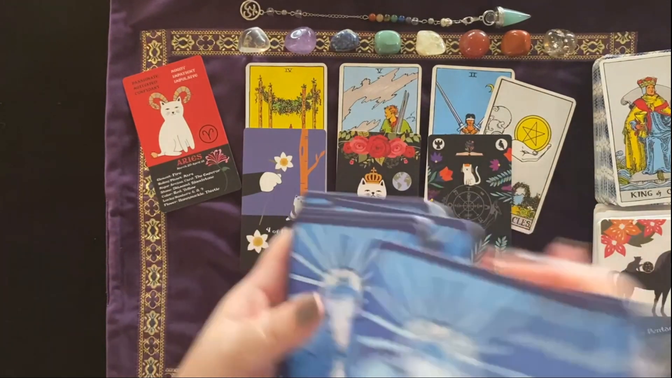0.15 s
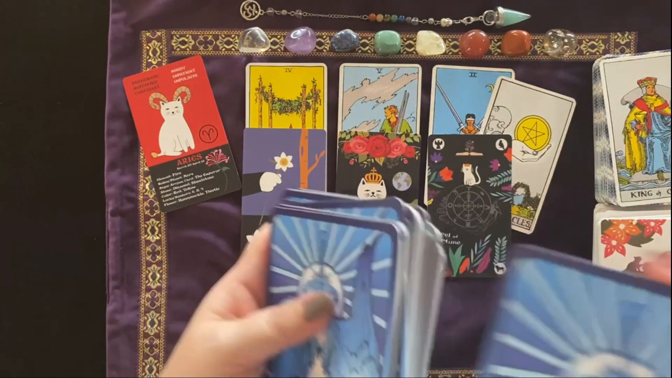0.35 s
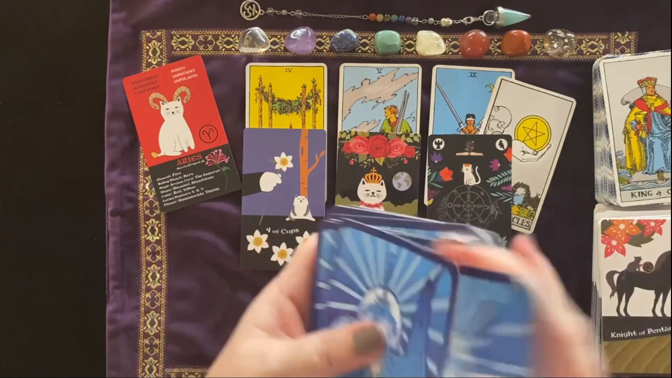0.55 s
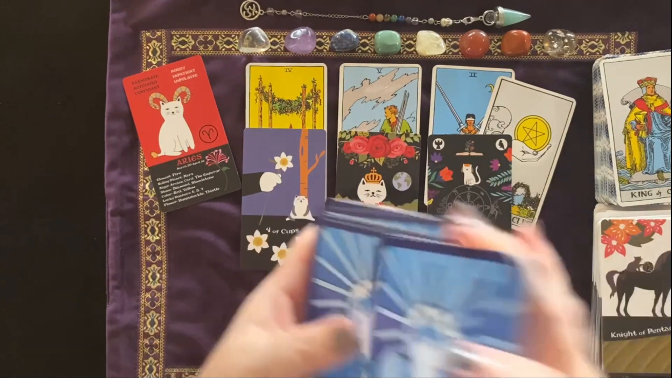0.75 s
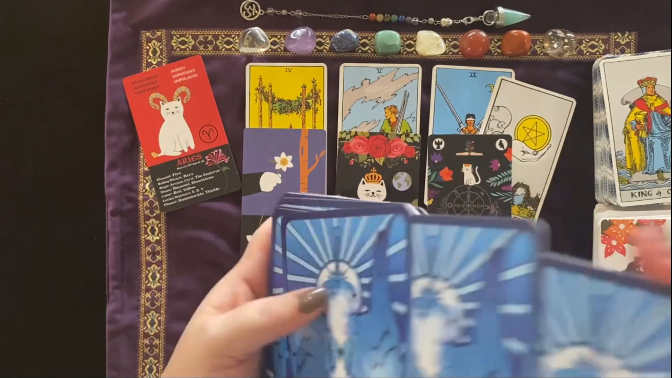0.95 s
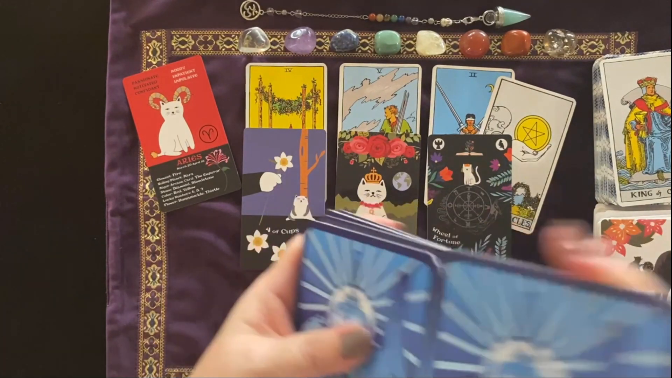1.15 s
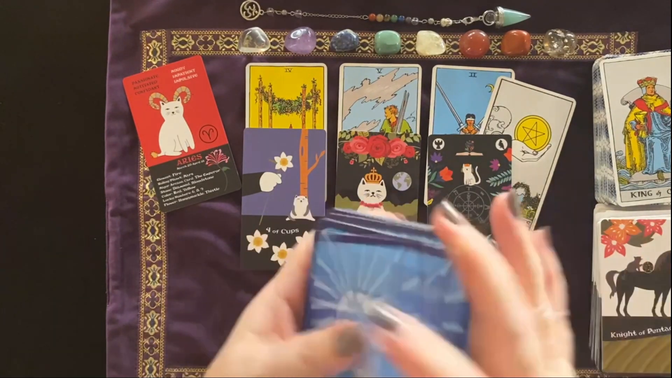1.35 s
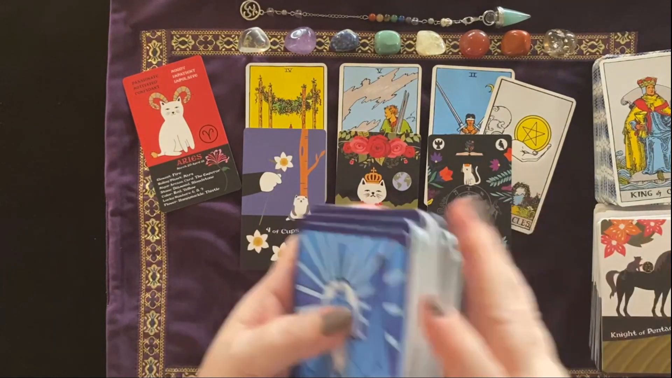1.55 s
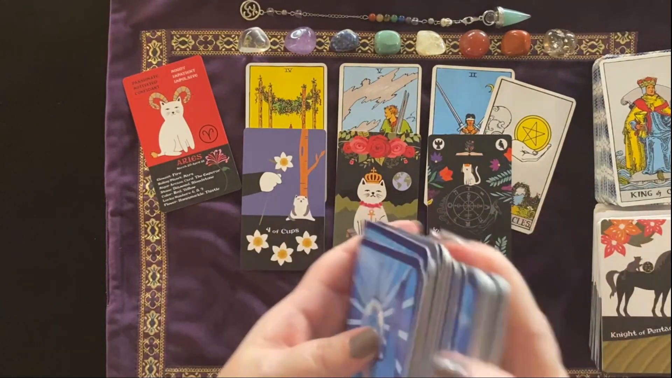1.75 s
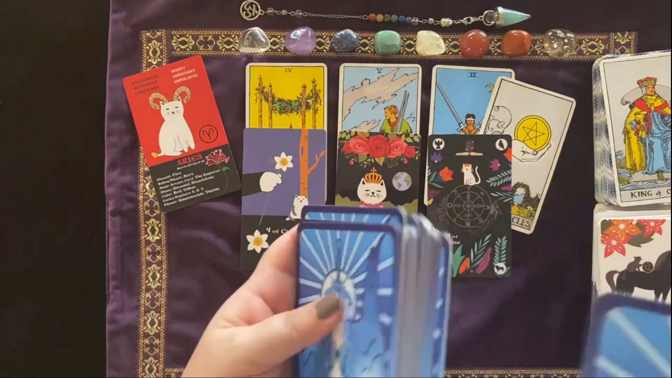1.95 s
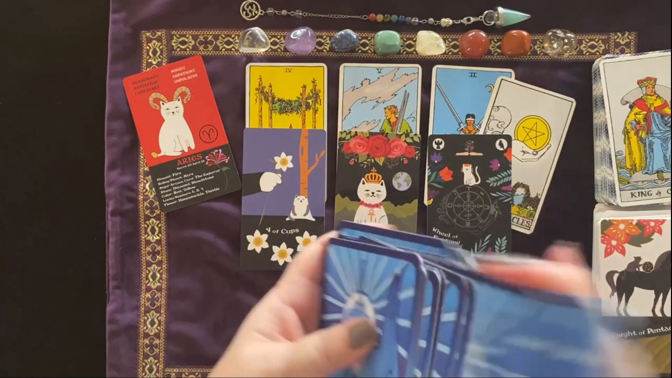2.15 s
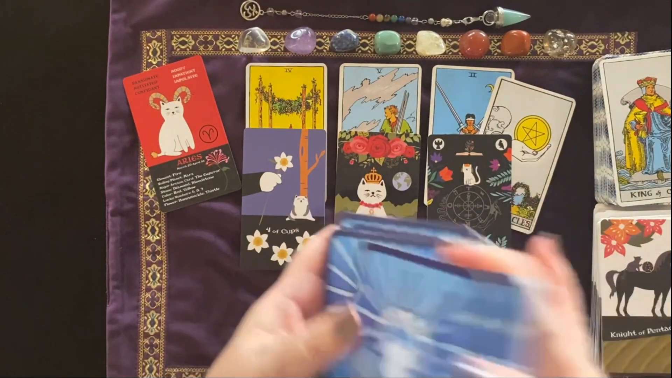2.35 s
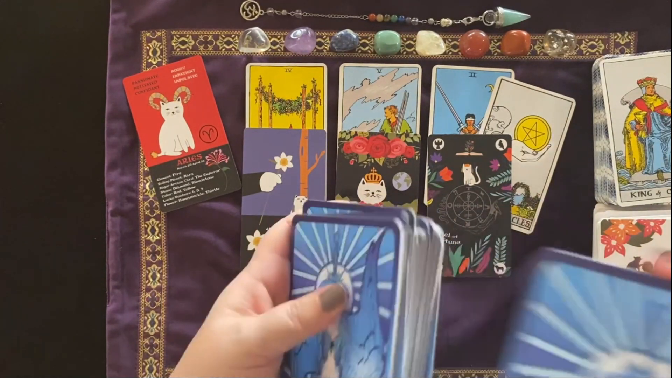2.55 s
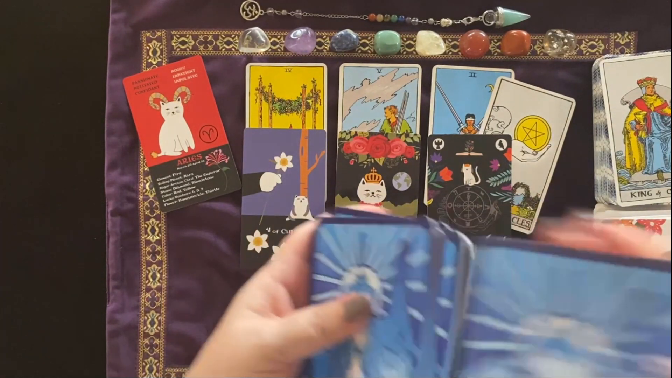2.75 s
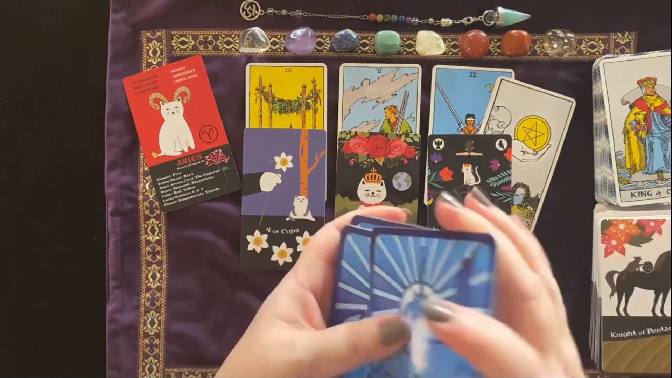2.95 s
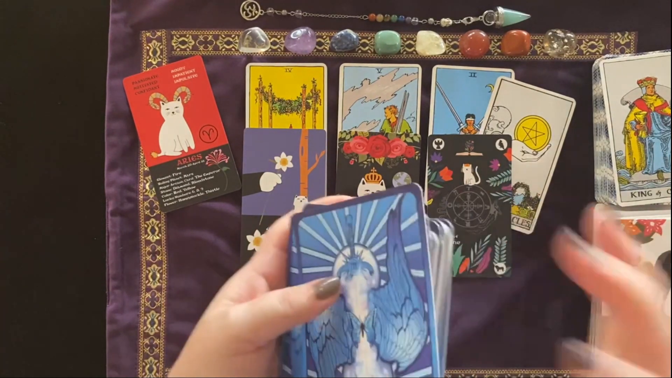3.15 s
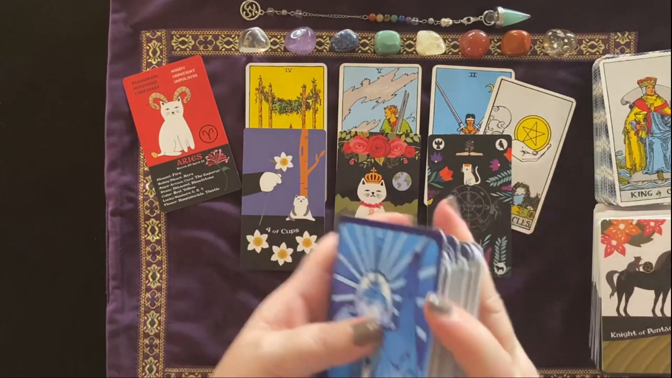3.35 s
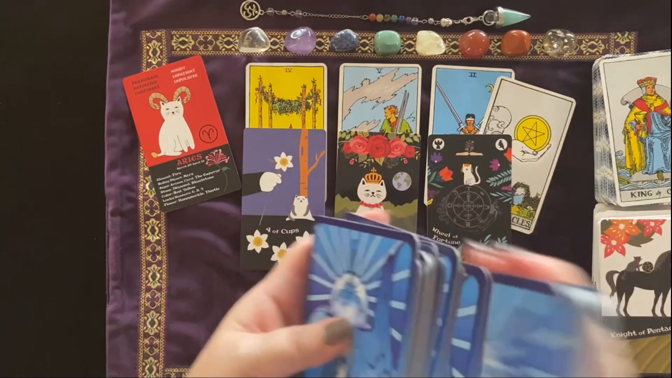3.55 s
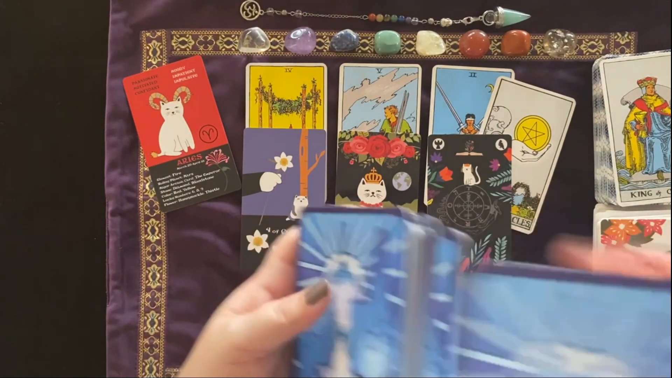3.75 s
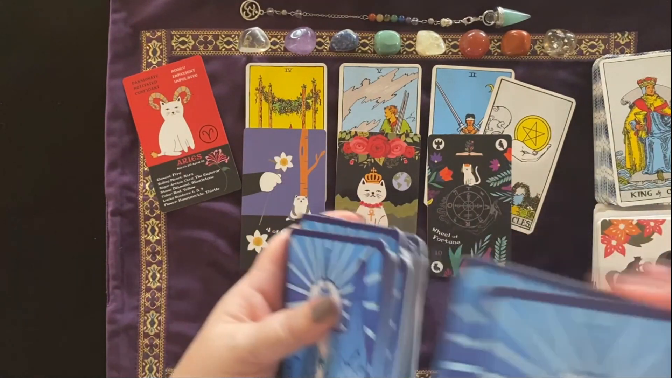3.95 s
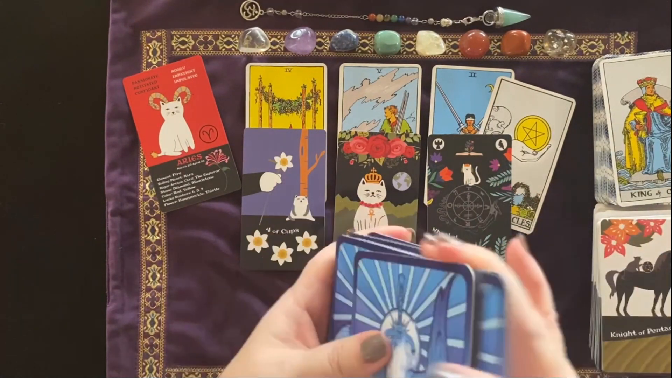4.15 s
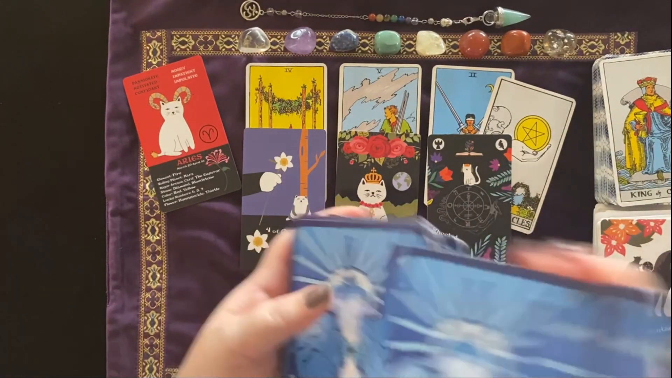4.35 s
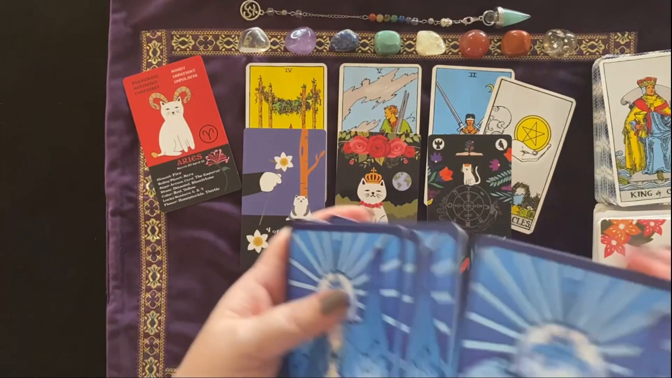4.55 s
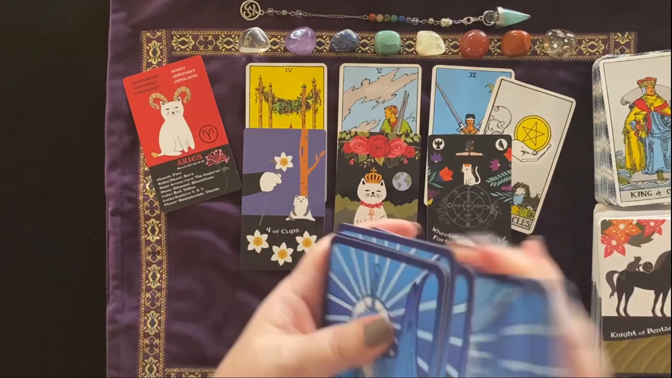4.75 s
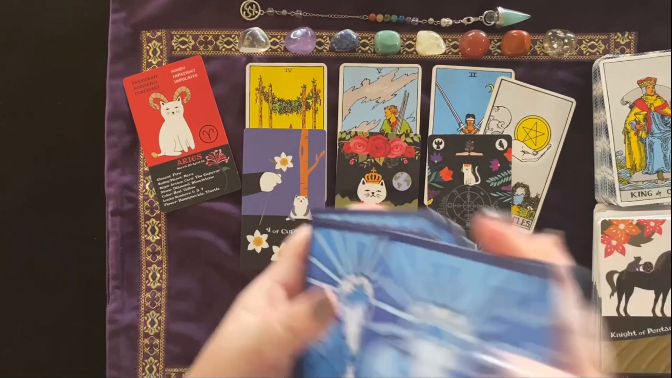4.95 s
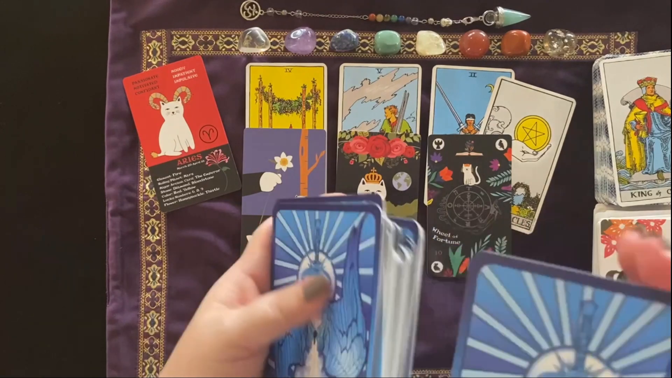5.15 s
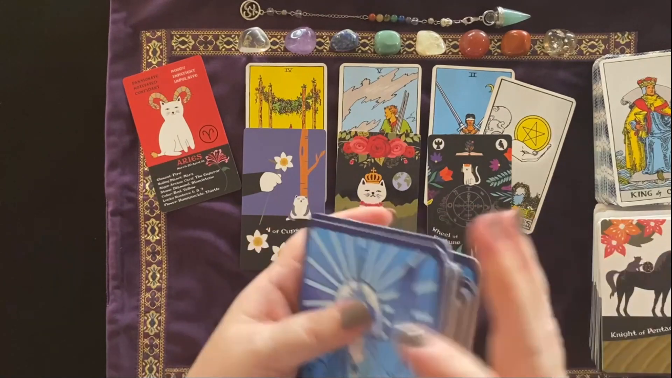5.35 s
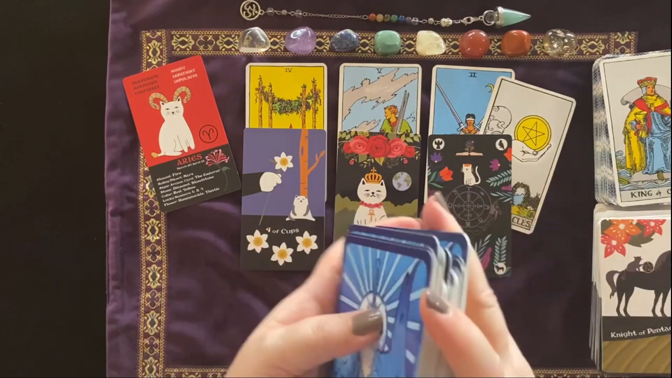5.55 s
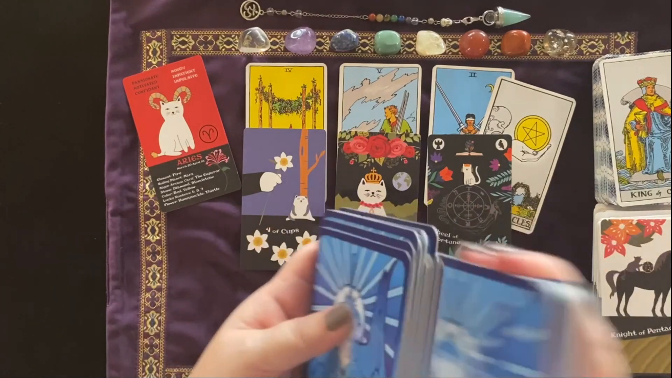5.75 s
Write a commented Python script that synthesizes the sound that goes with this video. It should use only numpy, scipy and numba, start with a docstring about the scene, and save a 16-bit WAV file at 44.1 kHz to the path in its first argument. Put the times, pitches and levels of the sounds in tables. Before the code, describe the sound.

Close overhand card shuffling in a quiet room: edges flick and rasp, and small stacks slide and land with soft thuds.

```python
"""A thick deck of large cards is shuffled overhand, close below a phone in a quiet furnished room.
In each stroke the card edges tap and rasp into the deck, then the packet (a small stack of cards)
slides home with a hiss and lands with a soft thud. The whole deck knocks in the hand, fingers brush it
and a bent card sometimes rings. Behind it are a short echo, faint air noise and a low hum in the lull."""
import sys
import numpy as np
from scipy import signal
from scipy.fft import rfft, irfft, next_fast_len
from scipy.io import wavfile
from scipy.ndimage import uniform_filter1d
from numba import njit

SR = 44100
rng = np.random.default_rng(int(sys.argv[2]) if len(sys.argv) > 2 else 0)


def unload_audio(sound):
    """Save the sound as a 16-bit wav file, at the path given as the first command line argument."""
    columns = np.transpose(np.atleast_2d(sound))
    # keep every value between -1 and 1, then stretch to whole-number steps
    steps = np.round(np.clip(columns, -1, 1) * 32767)
    wavfile.write(sys.argv[1], SR, steps.astype(np.int16))


N = 255862
T = np.arange(N) / SR
FFT_SIZE = 2 * next_fast_len(N // 2 + SR // 4)  # leaves space for the echo
HZ = np.maximum(np.arange(FFT_SIZE // 2 + 1) * SR / FFT_SIZE, 1)

# card edges meeting the deck: (time [s], level [dB], ring pitch [Hz], contact time [ms])
EDGE_TAPS = [(.009, -31, 2270, 1.2), (0.045, -30, 2470, 4.6), (0.199, -37, 3000, 0.32),
             (0.206, -24, 1900, 2.4), (.227, -15.5, 2160, 1.65), (.242, -22, 2630, 2.1),
             (.311, -30, 4100, 1.1), (.495, -33, 3020, 1.5), (0.501, -17.5, 1720, 0.83),
             (.507, -25.5, 2620, 1.6), (0.515, -18, 2730, 1), (.52, -16, 2360, 0.69),
             (.527, -13.5, 2750, 0.39), (.779, -24, 3570, 0.52), (0.798, -24, 1470, 0.71),
             (.814, -29.5, 1530, 1.3), (1.037, -41, 1970, 0.53), (1.068, -21.5, 1890, 1.43),
             (1.091, -24, 1670, 1.4), (1.104, -33, 1850, 3.9), (1.228, -48, 1100, .8),
             (1.346, -21.5, 2000, 1.04), (1.3726, -6.5, 2250, 0.28), (1.379, -21, 1950, 0.51),
             (1.384, -14.5, 3300, 0.4), (1.391, -27.5, 1750, 1.5), (1.716, -47, 1060, 2),
             (1.888, -30.5, 950, 0.85), (2.078, -19.5, 1400, 0.96), (2.085, -22.5, 3520, 1.9),
             (2.107, -20, 1570, 1.9), (2.1757, -18, 2780, 0.069), (2.197, -35, 900, 3),
             (2.376, -33, 1410, 0.56), (2.393, -41, 2100, 1), (2.406, -21, 2060, 2.7),
             (2.417, -14, 1990, 1.13), (2.422, -19, 2530, 1.6), (2.4806, -14.5, 4040, 0.24),
             (2.645, -29, 3520, 0.54), (2.677, -25, 1405, 0.57), (2.722, -28, 2000, 0.81),
             (2.77, -38, 980, 2.4), (2.878, -52.5, 1870, 1.8), (2.937, -32, 4870, 0.18),
             (2.959, -28, 2730, 1.1), (2.972, -29, 1850, 4.3), (3.022, -30, 2660, 2.9),
             (3.029, -30.5, 1082, 0.89), (3.29, -60, 4830, 0.82), (3.565, -39.5, 1856, 3),
             (3.802, -26.5, 1760, 0.43), (3.817, -18.5, 1600, 0.96), (3.911, -23.5, 5800, 2.1),
             (3.934, -44, 1530, 0.46), (4.111, -22.5, 990, 2.2), (4.123, -31, 2000, 7.3),
             (4.217, -24, 4500, 4.4), (4.23, -18, 5300, 0.58), (4.3985, -14.5, 3440, 0.38),
             (4.405, -28, 1540, 0.45), (4.43, -27.5, 2040, 1.8), (4.603, -37.5, 1460, 2.6),
             (4.657, -42, 1100, 1.1), (4.6897, -14.5, 2960, 0.18), (4.791, -32, 1070, 1.5),
             (4.992, -16.5, 2452, 3.1), (5.26, -42.5, 2340, 1), (5.288, -38.5, 2000, 1.1),
             (5.297, -38, 3542, 1.03), (5.787, -45.5, 1394, 0.81)]
# the notes a flexing card rings at: (pitch [Hz], width [Hz], level [dB])
CARD_NOTES = [(1600, 460, -5), (2103, 370, 0), (2650, 550, -5), (4900, 1530, -5.5)]
# shuffle strokes: (enters [s], slides [s], fastest [s], stops [s], entry level [dB], fastest level [dB])
SHUFFLE_STROKES = [(-.03, -0.001, 0.0032, 0.053, -33.5, -40), (0.191, 0.238, 0.29, .32, -40, -34.5),
                   (0.49, 0.537, 0.55, 0.61, -41.5, -36), (0.77, 0.82, 0.85, 1.018, -47.5, -46),
                   (1.01, 1.086, 1.146, 1.172, -50, -43), (1.334, 1.393, 1.34, 1.5, -48.5, -62.5),
                   (2.067, 2.121, 2.192, 2.207, -44, -41.5), (2.363, 2.427, 2.426, 2.48, -44.5, -32.5),
                   (2.638, 2.688, 2.735, 2.76, -45.5, -43), (2.926, 2.994, 3.053, 3.04, -50, -60.5),
                   (3.791, 3.847, 3.922, 3.932, -41, -39), (4.098, 4.139, 4.235, 4.244, -46.5, -38),
                   (4.386, 4.446, 4.525, 4.525, -51, -45.5), (4.671, 4.727, 4.738, 4.834, -49.5, -38),
                   (4.977, 5.009, 5.035, 5.108, -42, -36.5), (5.259, 5.27, 5.292, 5.291, -52.5, -50.5)]


def edge_taps():
    """A snap and a short chatter of card edges ring the air gap and the card; short contacts crack more."""
    out, t = np.zeros(N), np.arange(1024) / SR
    contacts_s = np.clip(np.transpose(EDGE_TAPS)[3], .05, 3)[:, None] / 1000
    snap = (1 - np.exp(-t / (0.5 * contacts_s))) * np.exp(-t / (1.89 * contacts_s))
    chatter = 0.09 * np.exp(-t / 0.0053)
    bursts = rng.standard_normal(snap.shape) * (snap + chatter)
    cracks = filtered(bursts, 1, [4000, 12000], "band")
    bursts = filtered(bursts, 4, 1050, "high")  # a thin card gives off no bass
    cards = sum(gain(db) * ring(bursts, hz, width) for hz, width, db in CARD_NOTES)
    for (time, db, hz, contact_ms), burst, card, crack in zip(EDGE_TAPS, bursts, cards, cracks):
        air_gap = ring(burst, hz, (0.3 + 0.079 / max(contact_ms, .1)) * hz)  # a short snap rings wider
        crack_db = db - 4 - 11.5 * contact_ms
        add(out, time, with_peak(air_gap + 0.29 * card, db) + with_peak(crack, crack_db))
    return out


def sliding_cards(hiss, rasp, scuff, stiffness):
    """Card faces hiss as they rub; the rougher edges make the card ring (rasp) and add a dull scuff."""
    # tone of rubbing edges and of rubbing faces: (frequency [Hz], level [dB])
    edge_tone = [(150, -5), (380, -2), (680, -8), (1100, -5), (1600, -11), (6000, -4), (9000, -11)]
    face_tone = [(2000, -27.5), (4500, -7.5), (6000, -13), (9000, -6), (11000, -7.5), (15500, -7)]
    grit = shaped_noise(edge_tone)
    card = sum((-1) ** k * gain(db) * moving_ring(grit, hz * stiffness, float(width))
               for k, (hz, width, db) in enumerate(CARD_NOTES))
    faces = shaped_noise(face_tone)
    # the air between the faces brightens a wandering band
    bright_hz = np.clip(5500 * gain(3.53 * wander(18)), 0, SR / 3)
    faces = faces + 1.8 * moving_ring(faces, bright_hz, 1200.0)
    return hiss * faces / np.std(faces) + (rasp * card + scuff * grit) / np.std(card)


def rubs():
    """Each rub of cards or fingers: (start, fastest, end) times, the levels there, rasp dB, scuff dB."""
    # fingers and loose cards brush the deck: (start [s], fastest [s], end [s], level [dB])
    brushes = [(0.066, 0.152, 0.15, -55.5), (0.971, 0.993, 1.02, -51), (1.583, 1.62, 1.767, -56.5),
               (1.743, 1.855, 1.912, -50), (1.976, 1.99, 2.08, -65), (2.203, 2.26, 2.305, -56),
               (2.786, 2.8, 2.82, -60), (3.258, 3.294, 3.28, -70.5), (3.32, 3.51, 3.67, -60),
               (3.617, 3.718, 3.735, -75), (4.296, 4.307, 4.37, -58), (4.536, 4.554, 4.9, -58.5),
               (4.617, 4.628, 4.81, -49.5), (5.108, 5.112, 5.22, -59.5), (5.442, 5.493, 5.545, -64.5),
               (5.547, 5.644, 5.6, -54.5), (5.616, 5.746, 5.87, -51.5)]
    for enter, slide, fastest, stop, entry_db, db in SHUFFLE_STROKES:
        yield (max(enter, -.001), slide, slide), (entry_db - 2.5, entry_db, entry_db), 6, -7.5  # edges
        stop_db = db - 150 * (stop - fastest)  # the slide fades as it slows
        yield (slide, fastest, stop), (entry_db - 5, db, stop_db), -9.5, -9.5  # faces
    for start, fastest, end, db in brushes:
        yield (start, fastest, end), (db - 10.5, db, db - 11.5), -5.5, -20.5


def friction():
    """How strongly the cards hiss, rasp and scuff over time, and how stiff the free part of a card is."""
    hiss, rasp, scuff, stiffness = np.zeros(N), np.zeros(N), np.zeros(N), np.ones(N)
    settle_s = 0.027  # loose cards settle softly after a rub
    for (start, fastest, end), levels_db, rasp_db, scuff_db in rubs():
        span = max(end - start, .004)
        first = max(int(start * SR), 0)
        t = np.arange(min(int((span + 4 * settle_s) * SR), N - first)) / SR
        now = slice(first, first + len(t))
        level = gain(np.interp(t, [0, np.clip(fastest - start, 0, span), span], levels_db))
        level *= (1 - np.exp(-t / 0.0088)) * np.exp(-np.maximum(t - span, 0) / 0.0033)  # quick stop
        settling = gain(levels_db[-1] - 22.5) * np.exp(-(t - span) / settle_s) * (t > span)
        # where rubs overlap, the louder one takes over
        hiss[now] = np.maximum(hiss[now], level + settling)
        rasp[now] = np.maximum(rasp[now], level * gain(rasp_db))
        scuff[now] = np.maximum(scuff[now], level * gain(rasp_db + scuff_db))
        add(stiffness, start, 1.1 * (t - span / 2) * (t < span))  # the free part shortens, its notes rise
    stiffness = uniform_filter1d(stiffness, size=200) * (1 + 0.11 * wander(25))
    # the edges catch and slip, and the grip trembles
    catches = roughness(spread_db=2.5, hold_samples=64, limit=3)
    slip = gain(0.8 * wander(200) + 2.8 * wander(50))
    grain = roughness(spread_db=2, hold_samples=24, limit=5)
    tremble = gain(wander(90) + 1.4 * wander(30))
    dips = dips_between_taps()
    return hiss * grain * tremble * dips, rasp * slip * catches * dips, scuff * slip * dips, stiffness


def dips_between_taps():
    """An entering packet rubs most around each tap, longer after it than before, and dips in between."""
    times = np.sort(np.transpose(EDGE_TAPS)[0])
    next_tap = np.clip(np.searchsorted(times, T), 1, len(times) - 1)
    away_s = np.minimum(np.abs(T - times[next_tap - 1]), 3 * np.abs(T - times[next_tap]))
    entering = sum((T > enter) & (T < slide + .005) for enter, slide, *_ in SHUFFLE_STROKES) > 0
    return gain(-8.5 * entering * (1 - np.exp(-(away_s / 0.0061) ** 2)))


def deck_knocks():
    """The whole deck answers each tap and each flat landing as one soft push."""
    # the notes of the deck in the hand: (pitch [Hz], width [Hz], level [dB])
    deck_notes = [(143, 49, -5), (212.3, 85, -3.5), (276.3, 105, 0.5), (386.6, 169, 7.5), (491, 150, -1.5),
                  (707, 730, 0)]
    # the packet lands flat: (time [s], level [dB], pitch of the deck as it is held [Hz])
    landings = [(0.009, -47.5, 358), (0.227, -35.5, 382), (0.518, -36, 410), (0.608, -41.5, 363),
                (0.779, -39, 470), (1.071, -52, 318), (1.373, -34.5, 268), (1.889, -45, 544),
                (2.079, -32, 345), (2.106, -38.5, 250), (2.177, -31, 337), (2.408, -38, 347),
                (2.484, -45.5, 227), (2.679, -38, 354), (2.723, -39, 436), (2.774, -40.5, 393),
                (3.024, -29.5, 489), (3.039, -32.5, 412), (3.816, -38.5, 270), (3.933, -45, 360),
                (4.111, -31.5, 460), (4.221, -49, 353), (4.795, -43.5, 263), (4.998, -34, 300),
                (5.095, -39, 450), (5.265, -45.5, 358)]
    out, t = np.zeros(N), np.arange(2048) / SR
    push = (t / .0004) * np.exp(-t / 0.00037)

    def knock(tuning):
        return sum(gain(db) * ring(ring(push, tuning * hz, tuning * width), tuning * hz, tuning * width)
                   for hz, width, db in deck_notes)

    tap_knock = knock(0.98)
    for time, db, _, contact_ms in EDGE_TAPS:
        knock_db = -46.5 + 0.66 * (db + 25) + 2.5 * (contact_ms - 1)  # loud or long taps push more
        add(out, time, with_peak(tap_knock, knock_db))
    for time, db, hz in landings:
        add(out, time, with_peak(knock(hz / 379), db))
    return out


def palm_thuds():
    """The packet lands on soft flesh: hardly more than one swing, dropping in pitch as the palm gives."""
    # landings in the palm: (time [s], level [dB], pitch that the drop is scaled from [Hz])
    thuds = [(.004, -39.5, 70), (0.051, -39.5, 81.5), (0.224, -49, 104), (.312, -40, 117),
             (0.521, -50, 107), (0.617, -46, 78.4), (0.791, -51, 70.4), (1.075, -48, 94),
             (1.178, -44.5, 62), (1.441, -43, 107), (2.111, -42, 101.6), (2.18, -43, 102),
             (2.489, -46.5, 106), (2.759, -39, 68), (2.98, -40.5, 71.2), (3.04, -35, 99.6),
             (3.827, -43, 92), (3.936, -48, 64.5), (4.129, -44.5, 70), (4.235, -43, 59.3),
             (4.431, -45, 78.9), (4.526, -47, 80.55), (4.714, -44.5, 83.1), (4.797, -43, 90),
             (4.999, -49, 84), (5.27, -51, 80.7)]
    out, t = np.zeros(N), np.arange(4000) / SR
    for (time, db, hz), (firmness, slowness) in zip(thuds, rng.uniform(0.1, 1.54, (len(thuds), 2))):
        pitch_hz = hz * (0.69 + 1.64 * firmness * np.exp(-t / 0.0041))
        swing = np.sin(2 * np.pi * np.cumsum(pitch_hz) / SR)
        level = (1 - np.exp(-t / (0.0019 * slowness))) * np.exp(-t / 0.014)
        add(out, time, with_peak(swing * level, db))
    return out


def bent_cards():
    """A bent card chatters as it rubs and rings on one note for a moment."""
    # rubs of a bent card: (start [s], length [s], pitch [Hz], level [dB])
    bends = [(1.011, 0.071, 2140, -45), (1.104, 0.056, 2340, -41), (1.648, 0.03, 3050, -54),
             (1.823, 0.037, 1820, -48.5), (5.701, 0.022, 1850, -62), (5.739, 0.025, 1856, -47.5)]
    out, t = np.zeros(N), np.arange(4096) / SR
    noise = rng.standard_normal((len(bends), 4096))
    chatter = gain(3.7 * np.repeat(rng.standard_normal((len(bends), 32)), 128, axis=1))
    for (start, length, hz, db), rub in zip(bends, noise * chatter):
        swell = np.sqrt(np.sin(np.pi * np.clip(t / length, 0, 1)).clip(0))
        note = ring(ring(rub * swell, hz, width_hz=220), hz, width_hz=440)
        add(out, start, with_peak(note, db))
    return out


def room_echo(sound):
    """The room's soft echo: noise whose octaves die away at their own rates."""
    # how long the room rings: (frequency [Hz], time to fade by 60 dB [s])
    fade_times = [(100, 0.63), (1000, 0.54), (3000, 0.46), (6000, 0.37), (14000, 0.2)]
    bands_hz, fades_s = np.transpose(fade_times)
    t, tail = np.arange(SR // 2) / SR, 0
    for hz in 62.5 * 2 ** np.arange(9):
        fade_s = np.interp(np.log(hz), np.log(bands_hz), fades_s)
        tail = tail + ring(rng.standard_normal(len(t)), hz, hz) * gain(-60 * t / fade_s)
    tail *= 1 - np.exp(-t / 0.001)
    return irfft(rfft(sound, FFT_SIZE) * rfft(tail, FFT_SIZE))[:N] / np.sqrt(np.sum(tail ** 2))


def low_hum():
    """A slightly wavering low tone swells during the lull."""
    # the hum's swell: (time [s], level [dB])
    swell = [(3.001, -102), (3.149, -61.5), (3.45, -57.5), (3.62, -63), (3.851, -72)]
    level_db = np.interp(T, *np.transpose(swell), left=-120, right=-120) + 1.2 * wander(14)
    pitch_hz = 73 + 1.5 * wander(9)
    return gain(level_db) * np.sin(2 * np.pi * np.cumsum(pitch_hz) / SR)


def still_air():
    """The mostly deep noise of a quiet room."""
    # tone of the air: (frequency [Hz], level [dB])
    air_tone = [(25, -15), (70, -8), (250, -21), (1300, -24), (2300, -35.5), (5000, -37.5), (15000, -45.5)]
    return shaped_noise(air_tone)


def microphones(shared, apart):
    """Left and right differ in level and timing, and each hears the wide deck a little differently."""
    # how far left is ahead of right: (frequency [Hz], phase [radians])
    left_lead = [(0, 0), (2500, .4), (5170, .5), (7350, 3.14), (9910, 6.1), (10900, 6.4), (13500, 9.4),
                 (16500, 12.6)]
    # how much louder left is: (frequency [Hz], left minus right [dB])
    balance = [(100, 1), (380, 1.5), (800, 8.5), (1500, 3.5), (3000, 0), (4400, -0.5)]
    # how alike the two sides are: (frequency [Hz], likeness [0-1])
    likeness = [(100, .95), (700, .5), (1900, .86), (3300, .7), (5500, .8), (6600, .88), (7300, .996),
                (8300, .84), (13500, .99), (15000, .8)]
    alike = np.clip(curve(likeness), 0, 1)
    lean_left = gain(curve(balance) / 2) * np.exp(.5j * np.interp(HZ, *np.transpose(left_lead)))
    shared = rfft(shared, FFT_SIZE) * np.sqrt((1 + alike) / 2)
    apart = rfft(apart, FFT_SIZE) * np.sqrt((1 - alike) / 2)
    return irfft(np.array([(shared + apart) * lean_left, (shared - apart) / lean_left]))[:, :N]


def gain(db):
    """Turn decibels into a multiplier."""
    return 10 ** (np.asarray(db) / 20)


def with_peak(sound, db):
    """Scale a sound to a peak level."""
    return sound * gain(db) / np.abs(sound).max()


def add(out, time, sound):
    """Mix a short sound in at a time in seconds."""
    i = max(int(time * SR), 0)
    out[i:i + len(sound)] += sound[:N - i]


def curve(table):
    """Join the points of a (frequency, value) table, with octaves evenly spaced."""
    hz, value = np.transpose(table)
    return np.interp(np.log(HZ), np.log(np.maximum(hz, 1)), value)


def shaped_noise(tone):
    """Noise with the given tone and an average strength (rms) of 1."""
    noise = irfft(rfft(rng.standard_normal(N), FFT_SIZE) * gain(curve(tone)))[:N]
    return noise / np.sqrt(np.mean(noise ** 2))


def wander(rate_hz):
    """A value that glides to a new random level rate_hz times a second."""
    hold = int(SR / rate_hz)
    return 1.7 * uniform_filter1d(np.repeat(rng.standard_normal(N // hold + 1), hold), hold)[:N]


def roughness(spread_db, hold_samples, limit):
    """Tiny random jumps in level that make rubbing sound grainy."""
    jumps = np.minimum(rng.exponential(size=N // hold_samples + 1), limit)
    return gain(spread_db * (np.repeat(jumps, hold_samples)[:N] - 1))


def filtered(sound, order, hz, kind):
    """Keep the highs or one band; a higher order cuts more steeply."""
    return signal.sosfilt(signal.butter(order, hz, kind, fs=SR, output="sos"), sound)


def ring(sound, hz, width_hz):
    """Make a sound ring at one pitch; a narrower width rings longer."""
    r = np.exp(-np.pi * width_hz / SR)
    feedback = [1, -2 * r * np.cos(2 * np.pi * hz / SR), r * r]
    return signal.lfilter([(1 - r * r) / 2, 0, (r * r - 1) / 2], feedback, sound)


@njit
def moving_ring(sound, hz, width_hz):
    """Make a sound ring at a pitch that moves every sample."""
    out, band_state, low_state = np.empty(len(sound)), 0., 0.
    for i in range(len(sound)):
        step, damping = np.tan(np.pi * hz[i] / SR), width_hz / hz[i]
        band = (band_state + step * (sound[i] - low_state)) / (1 + step * (step + damping))
        band_state = 2 * band - band_state
        low_state += 2 * step * band
        out[i] = damping * band
    return out


def scene():
    """The shuffled cards with their echo, still air and hum, in stereo."""
    rubbing = friction()
    bumps = deck_knocks() + palm_thuds()
    air_level = gain(-71 + 2 * wander(2.4))
    layers = []
    for direct_bumps in (bumps, 0):  # first what both sides share, then what sets them apart
        cards = sliding_cards(*rubbing) + edge_taps() + bent_cards()
        echo = gain(-16) * room_echo(cards + bumps)
        layers.append(cards + direct_bumps + echo + air_level * still_air())
    shared, apart = layers
    return microphones(shared + low_hum(), apart)


def record(dry):
    """The phone turns down its quietest moments above the bass, and cuts the top and the deepest bass."""
    quiet_db, cut_db_per_db = -70, 0.55
    dry = filtered(dry, 2, 38, "high")
    upper = filtered(dry, 1, 300, "high")
    level_db = 10 * np.log10(uniform_filter1d(np.mean(upper ** 2, axis=0), size=600) + 1e-14)
    kept = gain(cut_db_per_db * np.minimum(level_db - quiet_db, 0))
    treble_step = signal.ellip(6, .2, 22, 15800, fs=SR, output="sos")
    treble_wall = signal.ellip(10, .2, 80, 16600, fs=SR, output="sos")
    return signal.sosfilt(np.vstack([treble_step, treble_wall]), dry - upper * (1 - kept))


dry = scene()
out = record(dry)
unload_audio(out)
```